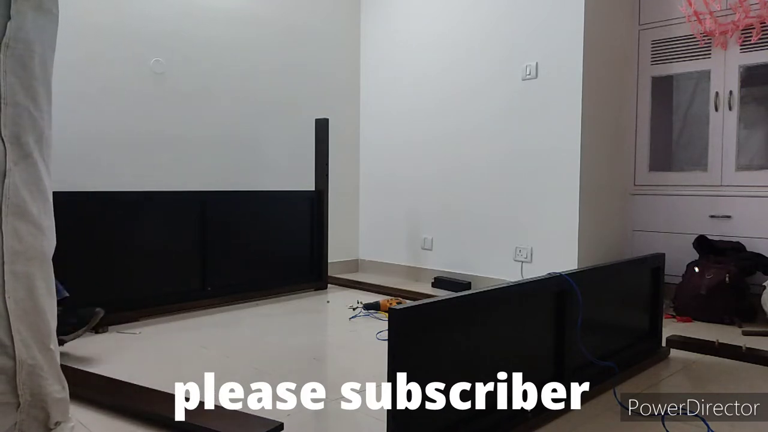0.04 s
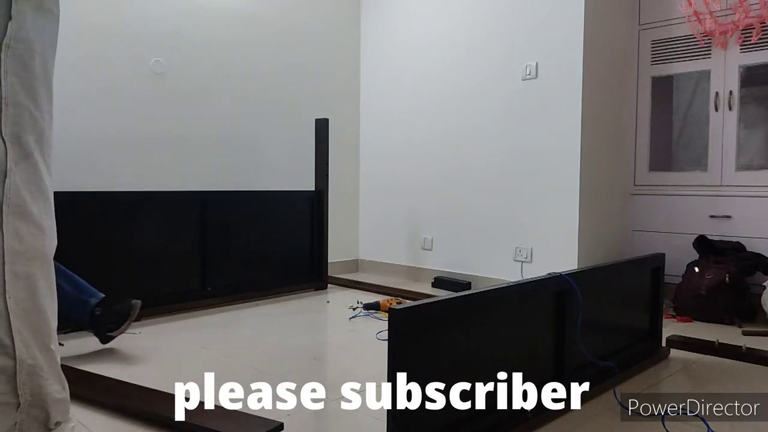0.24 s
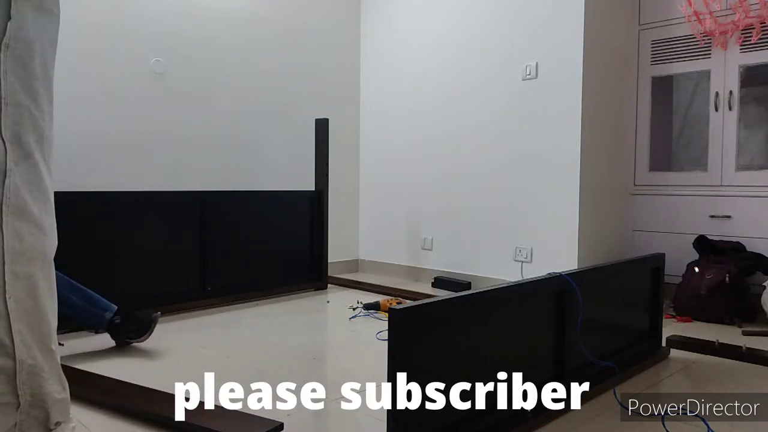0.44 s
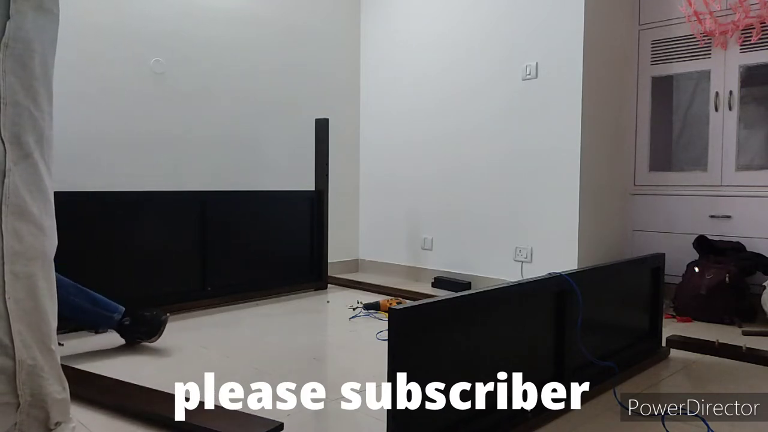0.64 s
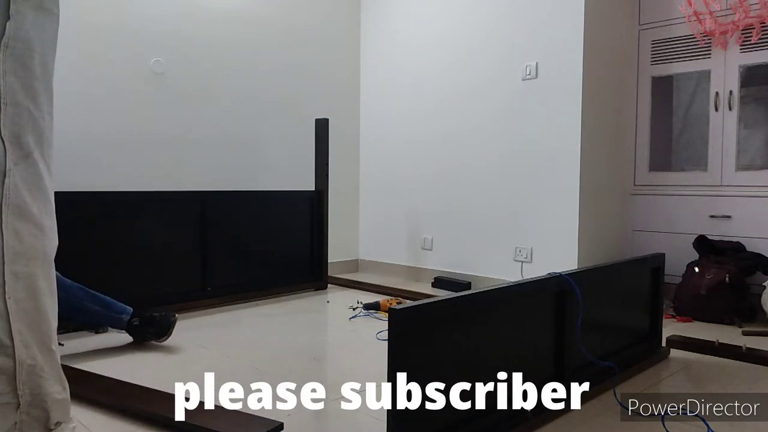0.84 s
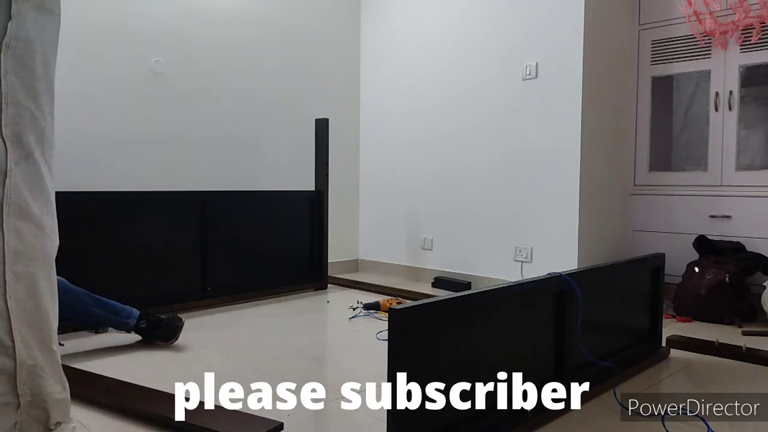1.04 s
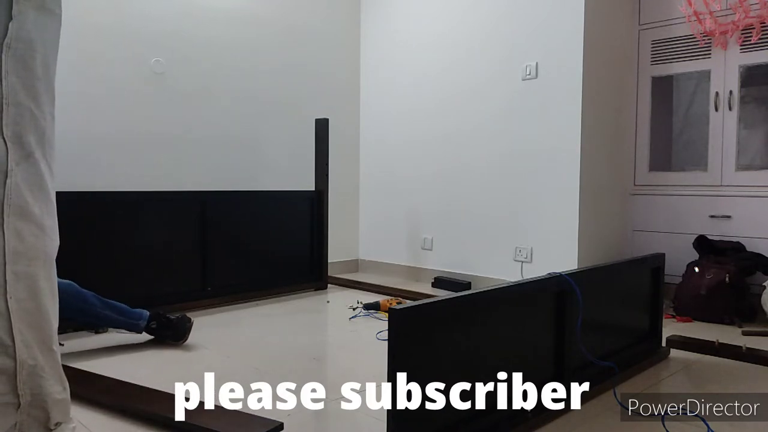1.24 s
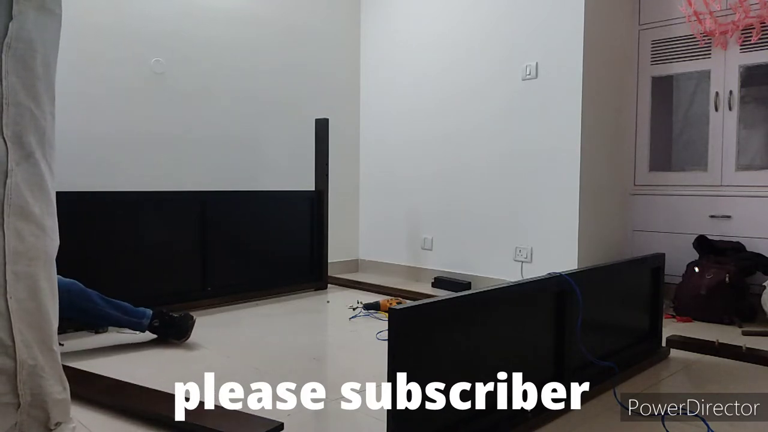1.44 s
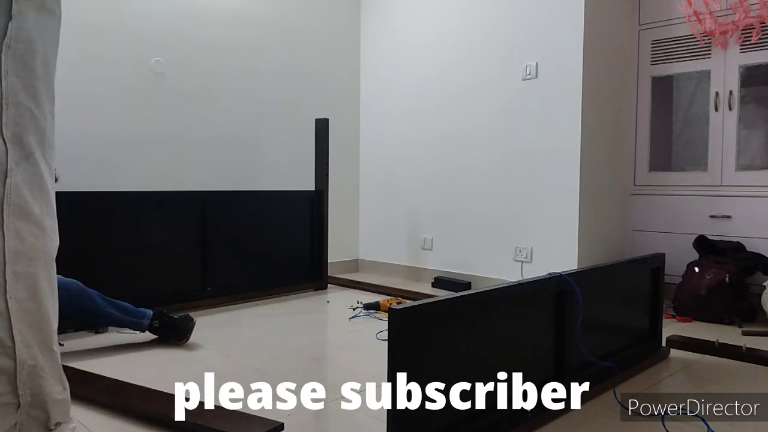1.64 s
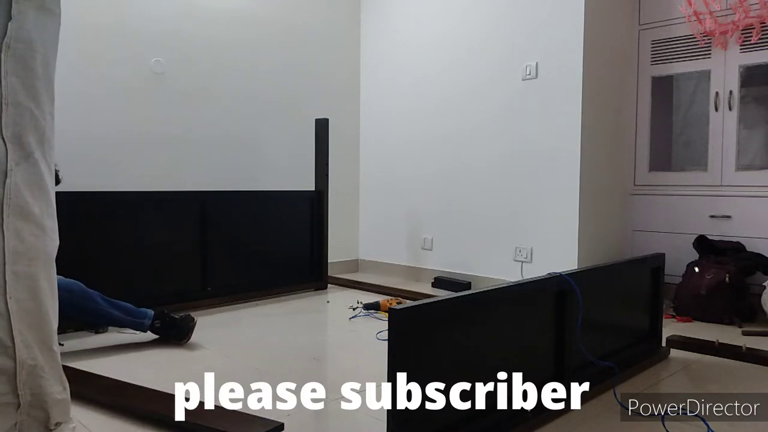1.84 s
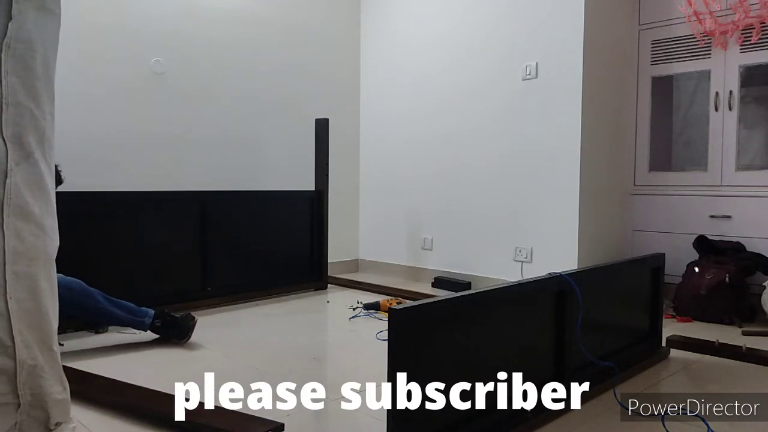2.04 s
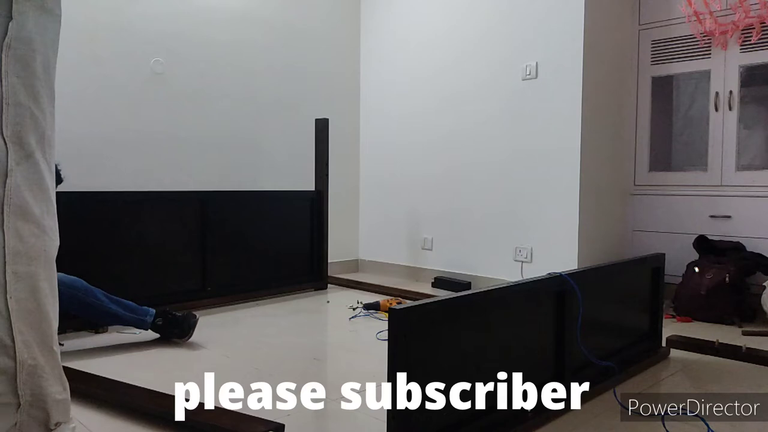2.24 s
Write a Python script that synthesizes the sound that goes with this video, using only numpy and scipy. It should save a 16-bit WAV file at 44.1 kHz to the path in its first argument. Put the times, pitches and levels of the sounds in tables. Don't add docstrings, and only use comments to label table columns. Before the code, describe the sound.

Wood clatter in a bare room: one loud board knock, a softer bump, later light taps

```python
import sys
import numpy as np
from scipy import signal
from scipy.fft import rfft, irfft, next_fast_len
from scipy.io import wavfile
from scipy.ndimage import uniform_filter1d, map_coordinates

SR = 44100
rng = np.random.default_rng(int(sys.argv[2]) if len(sys.argv) > 2 else 0)


def volts_from_db(level):
    exponent = np.asarray(level, float) / 20
    return 10 ** exponent


def master(y):
    cut = np.clip(np.atleast_2d(y).T, -1, 1)
    pcm = np.round(cut * 32767)
    wavfile.write(sys.argv[1], SR, pcm.astype(np.int16))


N = 101429

# start in seconds, strength in dB, hardness
# as top frequency in Hz.
DROP_CONTACTS = [
    (0.214, -27, 6000),
    (0.2221, -23, 9700),
    (0.2277, -21.5, 12200),
    (.247, -33, 9000),
    (.268, -32, 5000),
]
SETTLE_CONTACTS = [
    (0.415, -40.5, 4000),
    (.428, -34, 1500),
    (0.4392, -29, 4960),
    (.462, -33, 3920),
    (0.5203, -36, 4000),
    (.555, -37, 2550),
]
CLINK_CONTACTS = [
    (.7017, -48, 16100),
    (.7140, -38, 15700),
]
TAP_CONTACTS = [
    (2.004, -39, 3000),
    (2.0115, -37, 9000),
    (2.0173, -34.5, 12100),
    (2.045, -49, 6000),
    (2.1115, -49, 2500),
    (2.174, -55.5, 2500),
]
SLAT_CONTACTS = [
    (2.059, -55, 2470),
    (2.089, -50, 2480),
]
GLINT_ONSETS = [
    (.218, -84, 15700),
    (.2278, -77, 16000),
]

BOARD_HZ = [245, 307, 339, 366, 420, 525, 624, 790, 875, 945, 1100, 1620, 1843, 2240]
DROP_MODES = list(zip(BOARD_HZ, *np.transpose([(-20.5, 0.2), (-12, 1), (-9.5, 0.7), (-4, 0.24), (-6, 0.3),
              (-7, 0.52), (-19.5, .3), (-7.5, 0.64), (-0.5, 0.38), (-7.5, 0.63), (-12, 0.68), (-8, 0.21),
              (-5.5, 0.31), (-5.5, 0.2)])))
SETTLE_MODES = list(zip(BOARD_HZ, *np.transpose([(-5, 1), (-4.5, 0.99), (-19, 0.74), (-3, 0.47),
                (-8.5, 0.36), (-14, 0.32), (-0.5, 0.72), (-12, 0.73), (-7.5, 0.69), (-12.5, 0.77),
                (-1, 0.46), (-6.5, .3), (-5, 0.3), (-4.5, 0.16)])))
CLINK_MODES = [(1642, -1, .1), (1636, -13, 1.2), (2440, 2, .1), (2700, -8, .25)]
TAP_MODES = [(242, -5, .7), (307, -1, .65), (339, -4, .6), (640, 3, .26), (877, -5, .2), (1098, -3, .25),
             (1880, -13, .3), (5426, -13, .3), (7300, -18, .3)]
SLAT_MODES = [(1585, 5, 0.6)]
GLINT_TONES = [(11600, 0, 0.22), (12700, -2, .3)]

# frequency in Hz, density in dB per Hz.
DROP_BLOW = [(45, -54), (110, -12), (350, 1), (620, -6.5), (900, -4.5), (1330, -6), (1500, -12.5),
             (2200, -7.5), (3500, -20.5), (7500, -20), (12500, -40.5)]
SETTLE_BLOW = [(59, -53), (100, -10.5), (339, -1), (1110, -0.5), (1400, -9.5), (1700, -6), (2300, -10.5),
               (3330, -23.5), (7270, -21.5), (12000, -60)]
CLINK_BLOW = [(1200, -24), (1640, -5.5), (2500, -2.5), (3500, -13), (7520, -15.5), (10600, -39),
              (11900, -25), (13100, -13), (13600, -63)]
TAP_BLOW = [(76, -26), (200, -5), (350, -3), (470, -15), (638, -3), (1000, -3.5), (1410, -15), (2300, -22),
            (4000, -31), (7200, -29), (12000, -42)]

# ring over blow in dB, left over right in dB, top frequency in Hz, line blur in Hz.
PART_VOICES = [
    (1, 6.5, 9350, 7.3),
    (-1.5, 7, 7500, 8.3),
    (1, 6.5, 12900, 4.5),
    (-2, 5.5, 9400, 8.5),
    (-2, 12, 10000, 4),
    (17, 5, 14000, 30),
]

# frequency in Hz, t60 in seconds.
ROOM_T60 = [(100, 0.6), (400, 0.84), (1500, 0.72), (4000, 0.59), (9000, 0.48), (13300, 0.37), (15000, 0.14)]
# frequency in Hz, correlation from -1 to 1.
ROOM_ALIKE = [(100, 0.99), (300, 0.9), (700, 0.12), (3000, 0.024)]
# frequency in Hz, left over right in dB.
ROOM_LEAN = [(60, -13), (180, 2), (540, -3), (1630, -7), (4890, -8), (14700, -1.5)]

# time in seconds, firing rate in Hz, level in dB.
ENGINE_COURSE = [(0, 34.47, -87), (.83, 32.47, -75), (.93, 32.26, -49.5), (1.13, 32.14, -52),
                 (1.27, 31.85, -48), (1.35, 30.63, -46.5), (1.56, 31.37, -46.5), (1.95, 30.8, -46.5),
                 (2.25, 30.5, -55), (2.3, 31.28, -58)]
# multiple of the firing rate, level in dB.
ENGINE_ORDERS = [(1, 1), (2, -10), (3, -20)]
# (time in seconds, level in dB).
DRONES = [(74.7, [(0, -56), (.84, -57.5), (1.1, -57.5), (1.4, -55), (1.52, -61), (1.68, -50), (1.97, -53),
          (2.06, -77), (2.3, -65)]), (157.6, [(0, -72), (.7, -56), (1, -59), (1.4, -49.5), (1.5, -70),
          (2.3, -76)]), (185.5, [(0, -95), (1.05, -64), (1.15, -51), (1.33, -58.5), (1.42, -49.5),
          (1.54, -49), (1.66, -68), (2.3, -57)]), (107.3, [(0, -71), (2.08, -60), (2.18, -49),
          (2.27, -57.5), (2.3, -59)])]

# frequency in Hz, density in dB per Hz.
STREET_SPECTRUM = [(15, -57), (40, -11), (65, -25), (170, -7.5), (300, -17.5), (748, -16.5), (1130, -25),
                   (1790, -31), (4000, -49), (8000, -100)]
HISS_SPECTRUM = [(900, -16), (2000, -3), (3000, -6), (4500, -11.5), (7380, -1), (9110, -10.5),
                 (10300, -22.5), (12000, -55)]
SHEEN_SPECTRUM = [(9500, -48), (11000, -1), (14200, -4.5), (15100, -14), (15400, -71.5)]
# time in seconds, level in dB.
STREET_LEVEL = [(0, -48.5), (.2, -49.5), (.9, -46.5), (1.4, -49.5), (1.9, -52.5), (2.3, -52)]
HISS_LEVEL = [(0, -52.5), (.2, -54), (.66, -55), (.9, -55), (1.1, -59.5), (1.4, -62), (1.55, -66.5),
              (1.85, -64.5), (2.3, -65)]
SHEEN_LEVEL = [(0, -74), (.2, -76), (.27, -78), (.8, -79), (.9, -77), (1.42, -76), (1.5, -86), (2.3, -86.5)]
# frequency in Hz, correlation from -1 to 1.
AIR_ALIKE = [(60, 0.94), (180, 1), (540, 0.47), (1630, -0.13), (4890, 0.21), (14700, -0.28)]
# frequency in Hz, left over right in dB.
AIR_LEAN = [(60, 8), (180, 6), (540, 1.5), (1630, 2), (4890, -3.5), (14700, 4.5)]

TAIL_SAMPLES = 29000
GRAIN_DB, GRAIN_HZ = 2.5, 110
BEAT_DB, BEAT_PER_S = 3, 25
LONGEST_T60_S, RING_RISE_S = 1.29, 0.0011
RISE_CYCLES = 2.34
ROOM_RISE_S = 0.005
CRACK_DB, CRACK_T60_S = -3, 0.047
STREET_LAG_SAMPLES = 18


def unit(x):
    return x / np.sqrt(np.mean(x ** 2) + 1e-20)


def along(points, hz):
    point_hz, value = np.transpose(points)
    return np.interp(np.log(hz + 1), np.log(point_hz + 1), value)


def curves(rows):
    time_s, *columns = np.transpose(rows)
    return [np.interp(np.arange(N) / SR, time_s, column) for column in columns]


def wobble(knots_per_s, count=1):
    knots = rng.standard_normal((count, 200))
    place = np.arange(N) * knots_per_s / SR
    return np.array([map_coordinates(row, [place], mode="mirror") for row in knots])


def filtered(x, response):
    size = next_fast_len(x.shape[-1] + 8192)
    spectrum = rfft(x, size) * response(np.fft.rfftfreq(size, 1 / SR))
    return irfft(spectrum, size)[..., :x.shape[-1]]


def spread(pair, spectrum, alike, lean):
    def mid_side_gain(hz):
        angle = np.arccos(np.clip(along(alike, hz), -1, 1)) / 2
        return volts_from_db(along(spectrum, hz)) * [np.cos(angle), np.sin(angle)]

    mid, side = filtered(pair, mid_side_gain)
    stereo = np.array([mid + side, mid - side])
    return filtered(stereo, lambda hz: volts_from_db(along(lean, hz) * [[0.5], [-0.5]]))


def boards():
    out = np.zeros((2, N + SR))
    fade = np.minimum(1, np.arange(TAIL_SAMPLES)[::-1] / TAIL_SAMPLES * 5)
    parts = [(DROP_CONTACTS, DROP_MODES, DROP_BLOW),
             (SETTLE_CONTACTS, SETTLE_MODES, SETTLE_BLOW),
             (CLINK_CONTACTS, CLINK_MODES, CLINK_BLOW),
             (TAP_CONTACTS, TAP_MODES, TAP_BLOW),
             (SLAT_CONTACTS, SLAT_MODES, TAP_BLOW),
             (GLINT_ONSETS, GLINT_TONES, CLINK_BLOW)]
    for (contacts, modes, blow), (ring_db, pan_db, top_hz, blur_hz) in zip(parts, PART_VOICES):
        grain = rng.standard_normal(200)
        for start_s, db, hard_hz in contacts:
            soft = signal.butter(2, min(hard_hz, 20000), fs=SR, output="sos")
            top = signal.butter(10, min(top_hz, 20000), fs=SR, output="sos")
            sound = answer(blow, grain) + volts_from_db(ring_db) * ring(modes, blur_hz)
            sound = signal.sosfilt(np.vstack([soft, top]), sound) * fade
            gain = volts_from_db(db + pan_db * np.array([[0.5], [-0.5]]))
            out[:, round(start_s * SR):][:, :TAIL_SAMPLES] += gain * sound
    return out[:, :N]


def ring(modes, blur_hz):
    t = np.arange(TAIL_SAMPLES) / SR
    hz, db, t60_s = np.transpose(modes)[..., None]
    count = len(modes)
    luck = rng.standard_normal((4, count, 1))
    steps = rng.standard_normal((count, TAIL_SAMPLES))
    drift = np.cumsum(steps, axis=1) * np.sqrt(2 * np.pi * blur_hz / SR)
    knots = rng.standard_normal((count, 40))
    beat = np.array([np.interp(t * BEAT_PER_S, np.arange(40), row) for row in knots])
    decay_db = -60 * t / np.clip(t60_s, 0.05, LONGEST_T60_S)
    rise = 1 - np.exp(-t / (RING_RISE_S + RISE_CYCLES / hz))
    size = volts_from_db(db + BEAT_DB * beat + decay_db) * rise
    apart = np.sign(luck[2]) * 1.01 * np.arccos(np.clip(along(ROOM_ALIKE, hz), -1, 1))
    lean_db = along(ROOM_LEAN, hz) / 2 + 1.67 * luck[3]
    phase = 2 * np.pi * hz * t + drift + 3 * luck[1]
    return np.array([(size * volts_from_db(side * lean_db) * np.sin(phase + side * apart / 2)).sum(0)
                     for side in (1, -1)])


def answer(blow, grain):
    t = np.arange(TAIL_SAMPLES) / SR
    tail = spread(rng.standard_normal((2, TAIL_SAMPLES)), blow, ROOM_ALIKE, ROOM_LEAN)
    tail = filtered(tail, lambda hz: volts_from_db(GRAIN_DB * map_coordinates(grain, [hz / GRAIN_HZ])))
    crack = unit(tail.sum(0)) * volts_from_db(CRACK_DB - 60 * t / CRACK_T60_S)
    hz, frame_s, bands = signal.stft(unit(tail), SR, nperseg=512)
    bands = bands * volts_from_db(-60 * frame_s / along(ROOM_T60, hz)[:, None])
    tail = signal.istft(bands, SR, nperseg=512)[1][:, :TAIL_SAMPLES]
    return tail * (1 - np.exp(-t / ROOM_RISE_S)) + crack


def engine_and_drones():
    firing_hz, db = curves(ENGINE_COURSE)
    turn = 2 * np.pi * np.cumsum(firing_hz) / SR
    t = np.arange(N) / SR
    sway = wobble(9.1, count=2 * len(DRONES))
    out = np.zeros(N)
    for (order, order_db), w in zip(ENGINE_ORDERS, sway):
        out += volts_from_db(order_db + db + 0.53 * order * w) * np.sin(order * turn + 0.17 * w)
    for (hz, level), swell, throb in zip(DRONES, sway[::2], sway[1::2]):
        out += volts_from_db(curves(level)[0] + 2.4 * swell) * np.sin(2 * np.pi * hz * t + 1.88 * throb)
    return np.sqrt(2) * out * volts_from_db([[1.6], [-2.2]])


def air():
    street = volts_from_db(curves(STREET_LEVEL)[0] + 0.56 * wobble(5.94)) * rush(STREET_SPECTRUM, patchy_db=1.5)
    hiss = volts_from_db(curves(HISS_LEVEL)[0] + 1.5) * rush(HISS_SPECTRUM, patchy_db=3.5)
    sheen = volts_from_db(curves(SHEEN_LEVEL)[0]) * rush(SHEEN_SPECTRUM, patchy_db=3.5)
    return street + hiss + sheen


def rush(spectrum, patchy_db):
    bands = signal.stft(rng.standard_normal((2, N)), nperseg=1024)[2]
    field = uniform_filter1d(rng.standard_normal(bands.shape[1:]), size=5, axis=0)
    field = uniform_filter1d(field, size=7, axis=1)
    pair = signal.istft(bands * volts_from_db(patchy_db * unit(field)), nperseg=1024)[1][:, :N]
    return unit(spread(pair, spectrum, AIR_ALIKE, AIR_LEAN))


def scene():
    knocks = boards()
    left, right = engine_and_drones() + air()
    return knocks + np.array([np.roll(left, STREET_LAG_SAMPLES), right])


def low_pass(x):
    return signal.sosfilt(signal.butter(12, 15290, fs=SR, output="sos"), x)


def record(dry):
    return low_pass(dry)


dry = scene()
out = record(dry)
master(out)
```